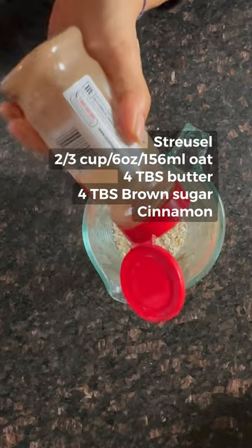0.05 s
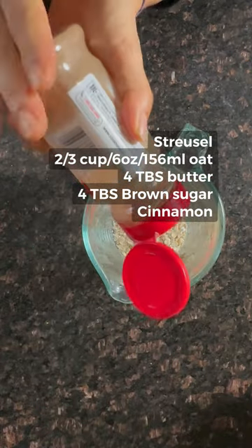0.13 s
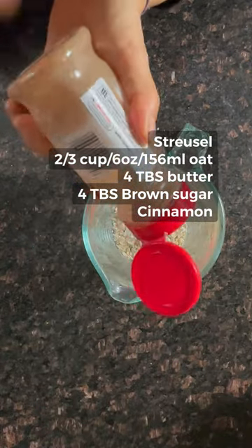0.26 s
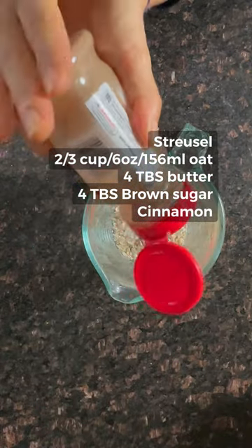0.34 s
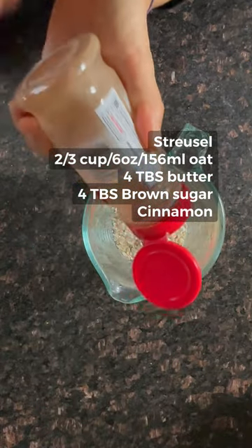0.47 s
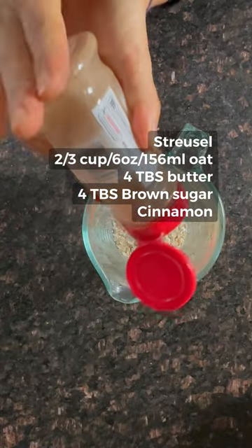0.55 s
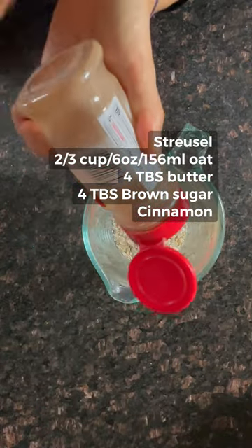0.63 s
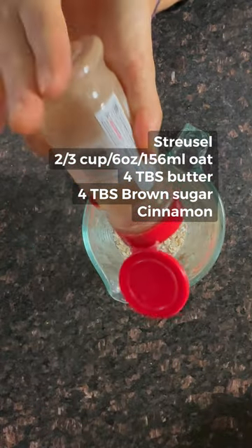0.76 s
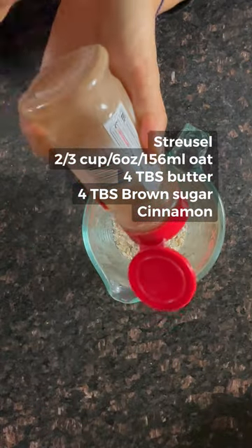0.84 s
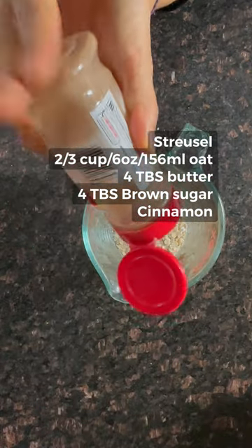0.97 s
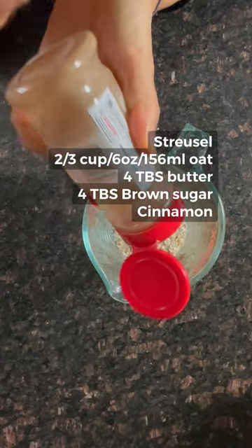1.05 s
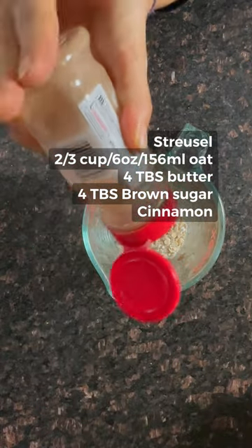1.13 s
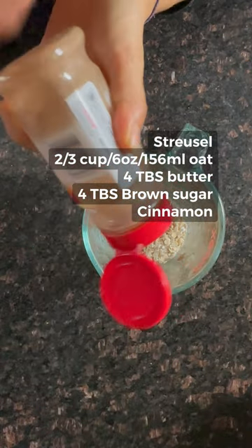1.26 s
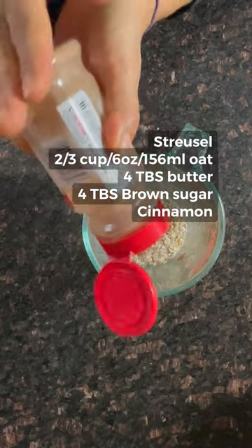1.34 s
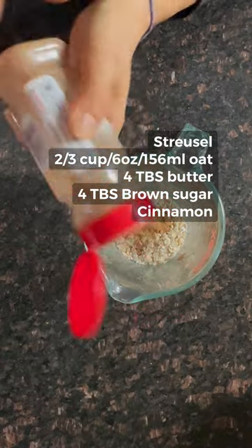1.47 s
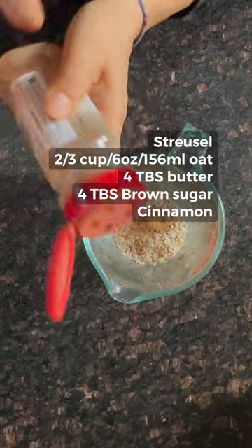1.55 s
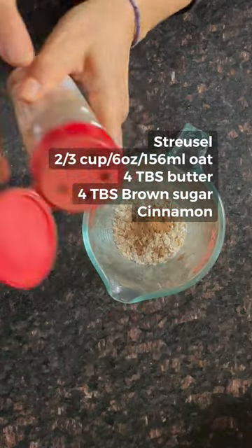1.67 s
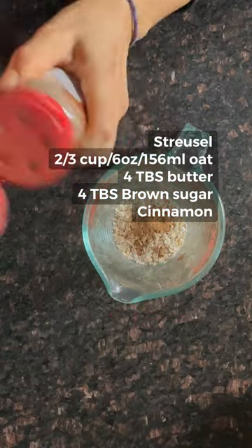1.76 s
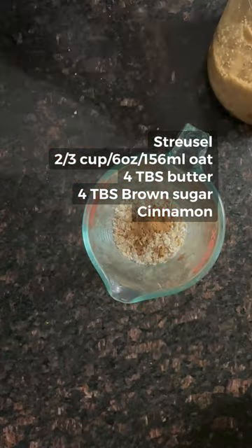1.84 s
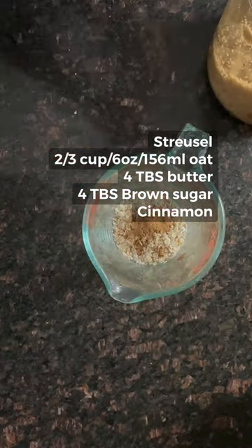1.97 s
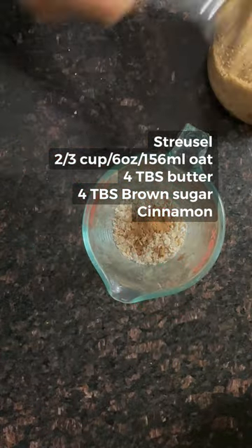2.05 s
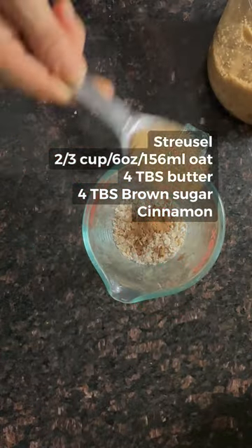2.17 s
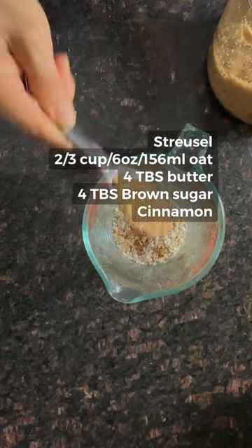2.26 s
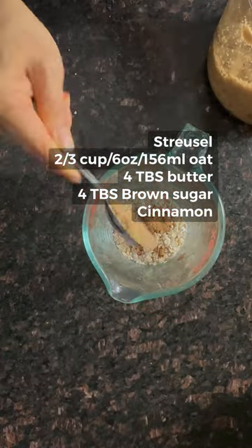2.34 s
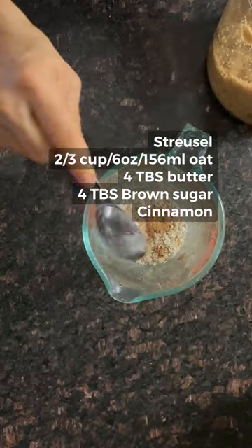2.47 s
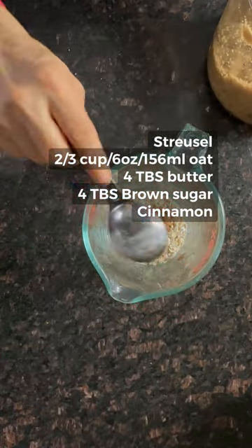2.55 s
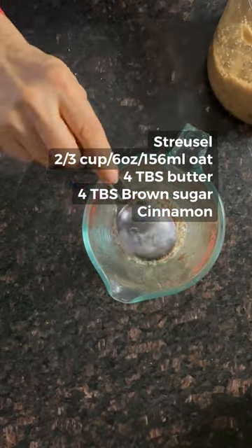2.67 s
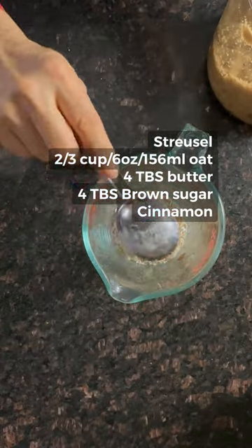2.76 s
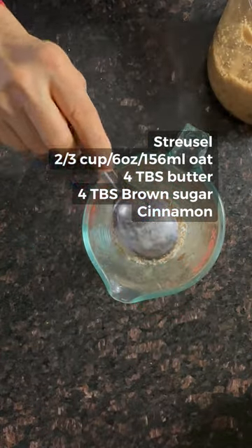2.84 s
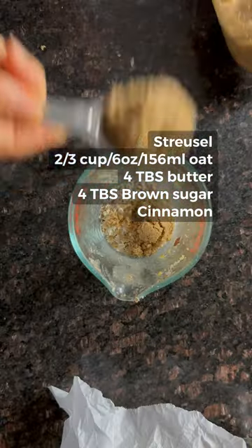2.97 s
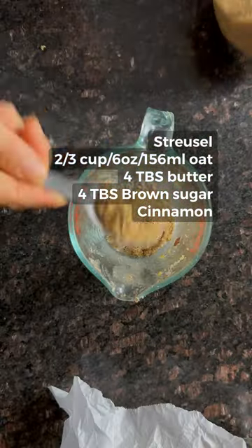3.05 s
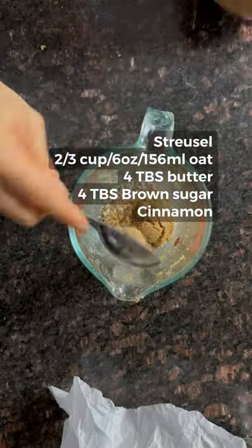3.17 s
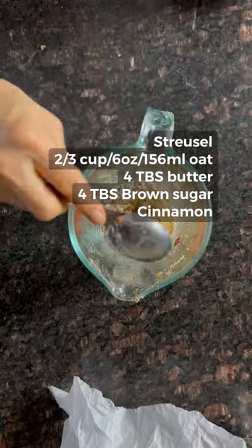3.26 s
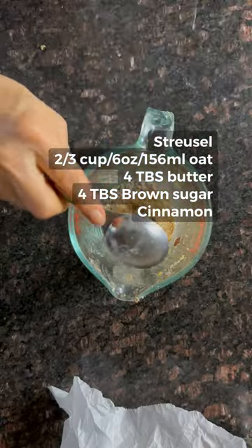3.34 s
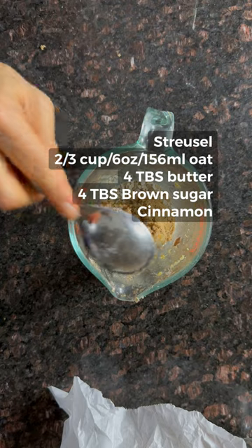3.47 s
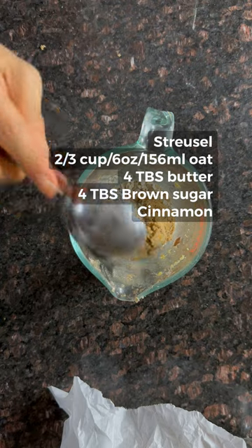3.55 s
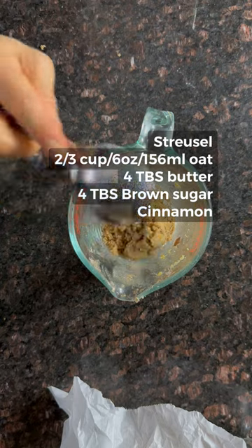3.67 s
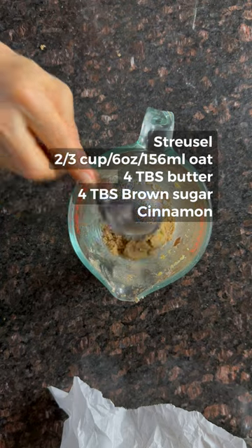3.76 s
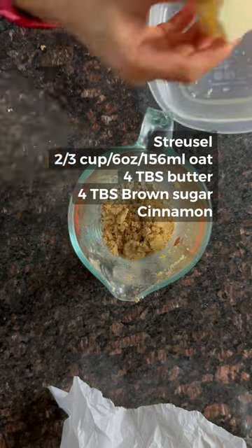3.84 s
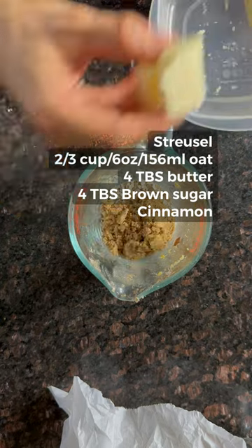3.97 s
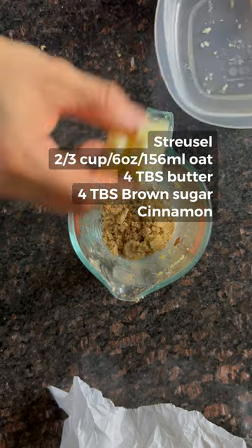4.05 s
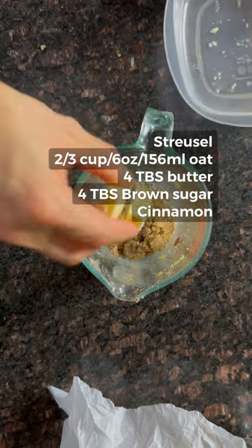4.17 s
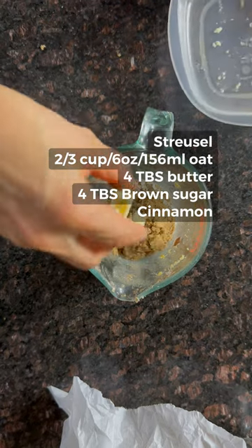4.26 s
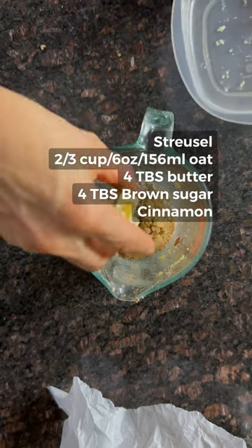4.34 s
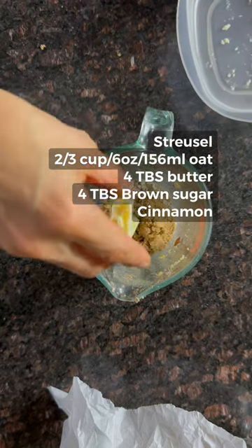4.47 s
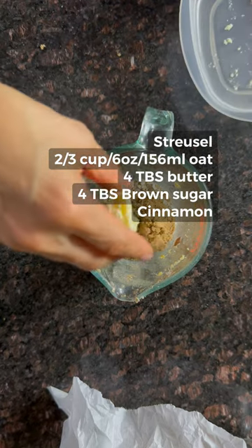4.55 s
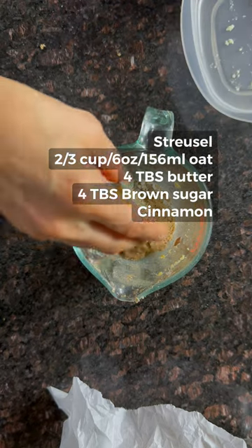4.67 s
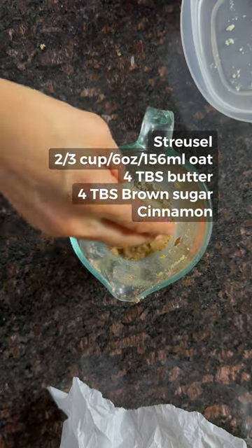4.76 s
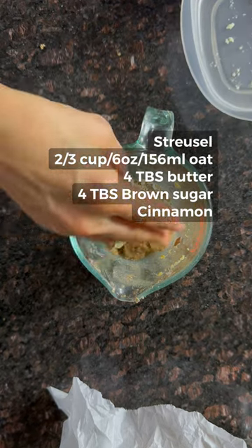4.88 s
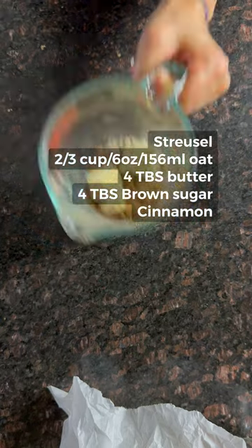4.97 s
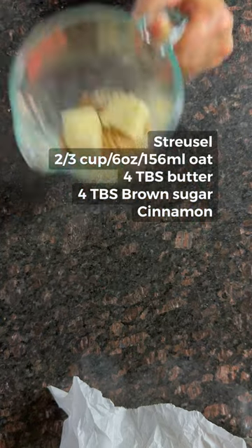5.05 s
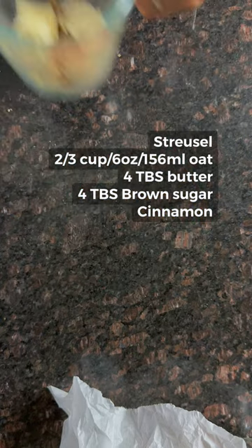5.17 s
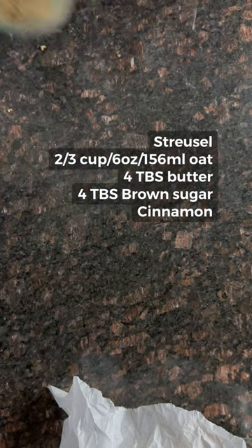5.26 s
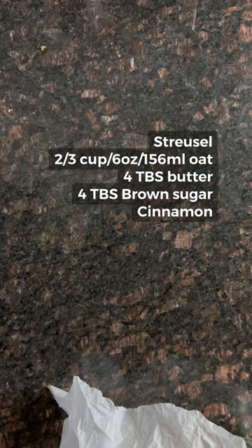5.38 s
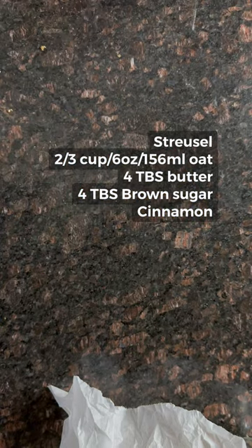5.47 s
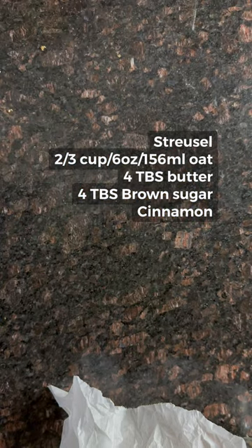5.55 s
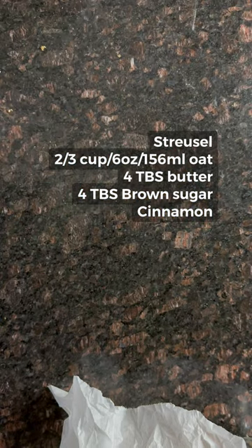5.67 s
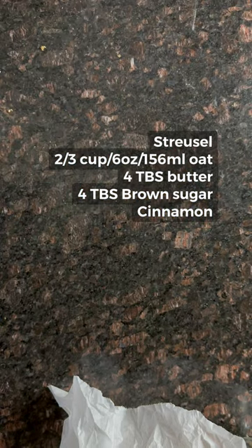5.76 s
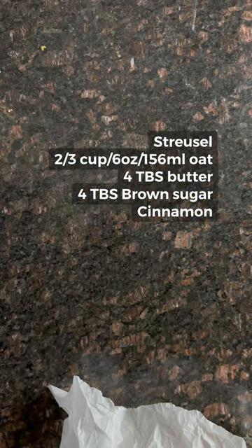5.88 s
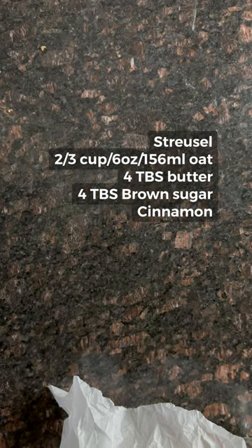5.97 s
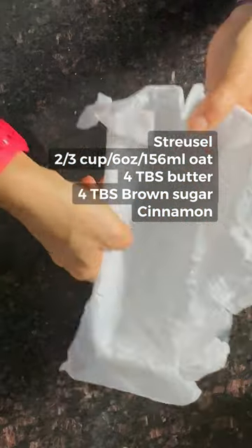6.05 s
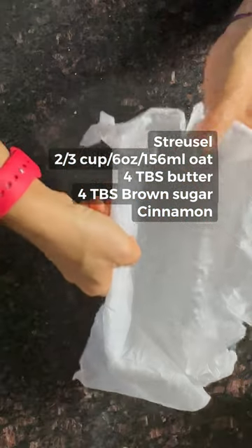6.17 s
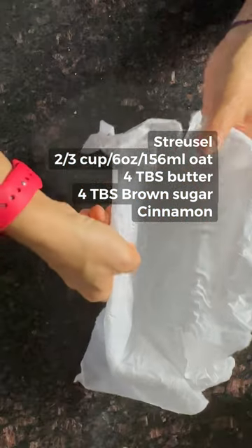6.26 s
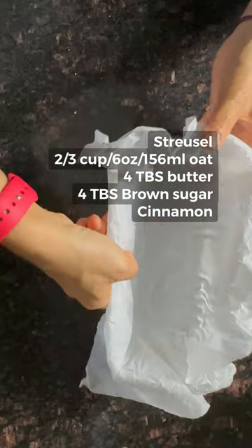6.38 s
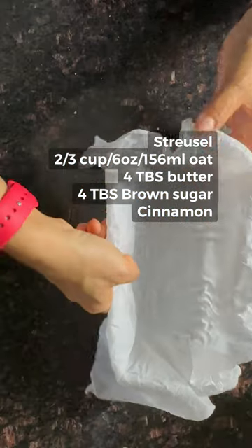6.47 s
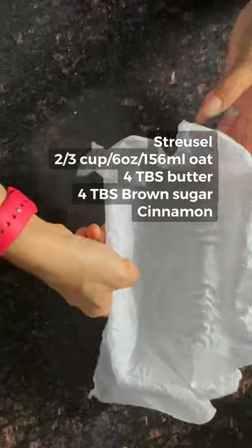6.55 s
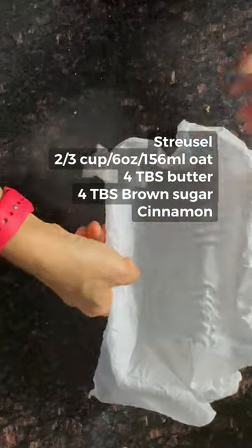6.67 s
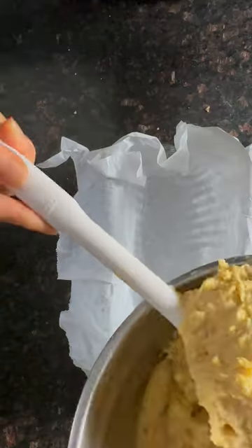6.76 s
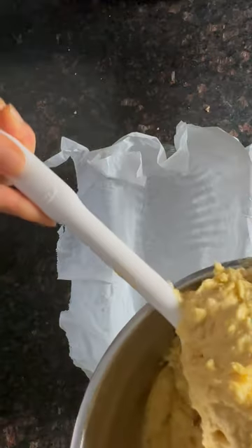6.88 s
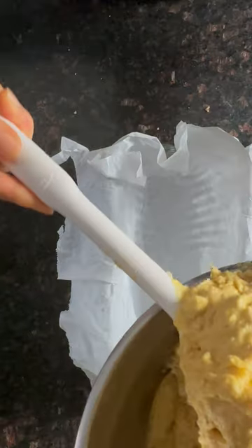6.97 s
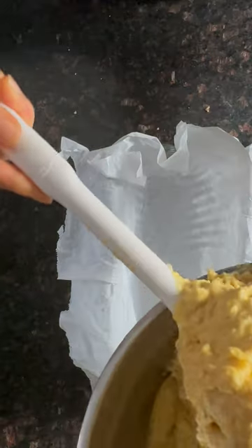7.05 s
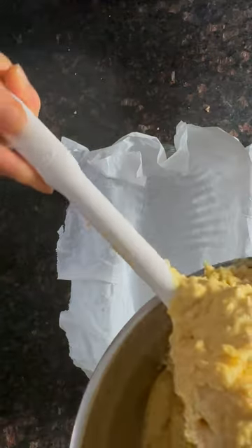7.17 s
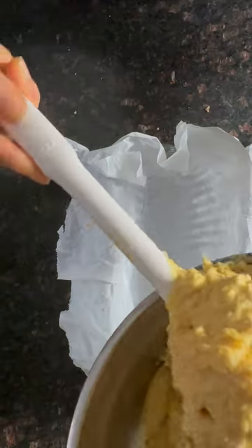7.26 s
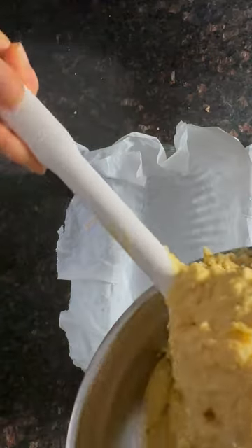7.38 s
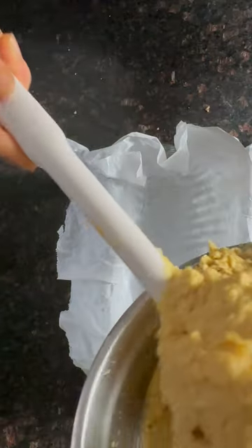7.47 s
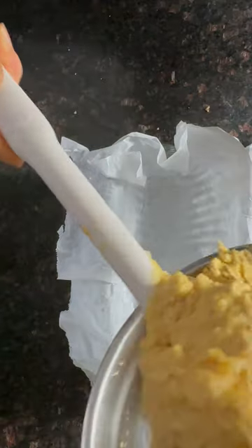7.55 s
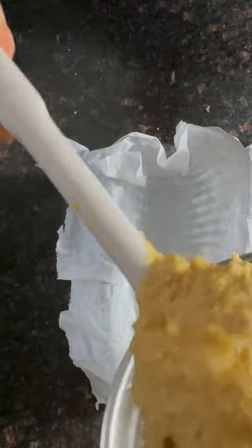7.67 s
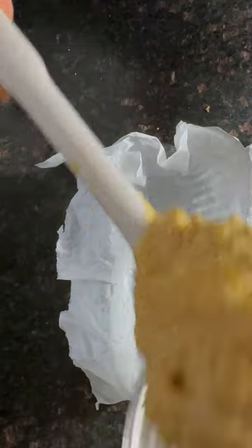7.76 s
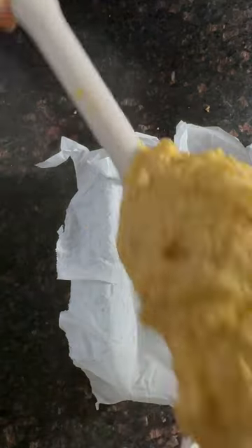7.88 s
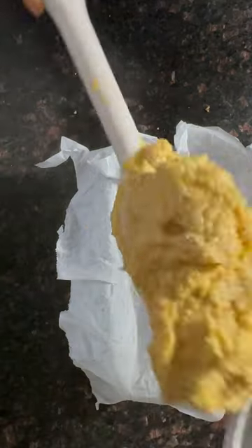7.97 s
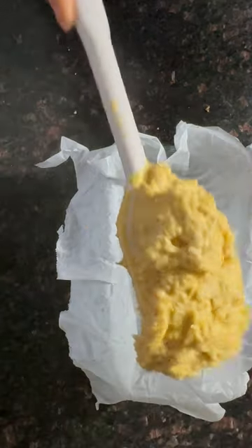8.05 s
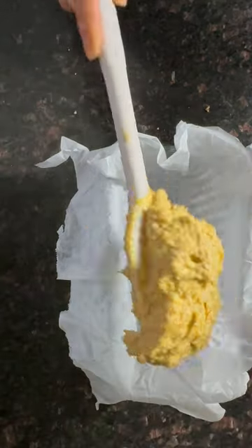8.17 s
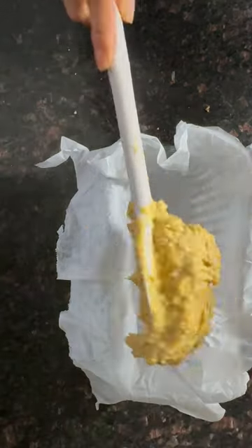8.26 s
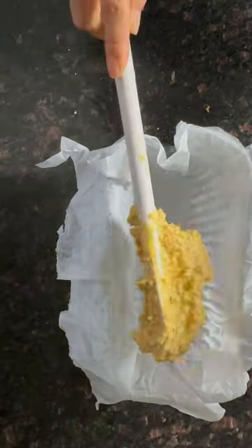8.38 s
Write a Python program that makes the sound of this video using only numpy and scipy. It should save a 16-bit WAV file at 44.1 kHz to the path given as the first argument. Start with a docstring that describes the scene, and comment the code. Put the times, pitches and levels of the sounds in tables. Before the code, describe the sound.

A low, steady refrigerator hum with soft moving air lasts throughout, in a kitchen with a short echo, heard closely in stereo. From 0.1 to 1.3 s a palm pats a hollow plastic jar every 0.2 s: dull, low-mid thumps with a quick rebound and tiny powder ticks, strongest from 0.3 to 0.9. Faint rubs follow. At 3.14 a lump of sugar drops with a brief grainy crunch; light street noise sits behind. At 3.76 a spoon knocks the glass cup in a rapid, damped clatter. From 3.8 to 4.98 a distant engine rises in pitch and swells with tyre noise, then cuts off with a small click. Faint crumbly ticks continue. At 6.03 come soft bumps and paper rustle, then a loud pan bang at 6.27, a brighter metallic contact around 6.46, and sharp paper snaps until 6.7. Afterwards, to 8.4, only very faint sticky crackles and scrapes over the hum.

```python
"""A refrigerator hum comes first and stays: a mains tone over shaped noise. In this kitchen, in short shots cut together,
a palm pats a plastic jar of cinnamon (damped modes, powder ticks), a spoon knocks sugar into a glass cup (grains,
clatter, ringing modes), a metal loaf pan lined with baking paper is put down (sheet noise, modes, snaps), and batter
is scraped from a bowl (crackling grains). For a moment a far vehicle gathers speed outside (rising engine orders
and tyre noise). Two microphones hear it all, most nearby sounds with a kitchen echo."""
import sys
import numpy as np
from scipy import signal
from scipy.fft import rfft, irfft, next_fast_len
from scipy.io import wavfile
from scipy.ndimage import uniform_filter1d, map_coordinates

SR = 44100
rng = np.random.default_rng(int(sys.argv[2]) if len(sys.argv) > 2 else 0)


def pcm_store(signal):
    """Save signal as 16-bit PCM."""
    levels = np.round(np.clip(np.atleast_2d(signal), -1, 1) * 32767)
    wavfile.write(sys.argv[1], SR, levels.astype(np.int16).T)


N = 371322


def amp(db):
    """Decibels to gain."""
    return 10 ** (np.asarray(db) / 20)


def unit(x):
    """Scale to rms 1."""
    return x / np.sqrt(np.mean(x ** 2) + 1e-20)


def crest(x):
    """Scale so that the loudest millisecond has rms 1."""
    power = uniform_filter1d(x ** 2, SR // 1000)
    return x / np.sqrt(power.max())


def along(points, hz):
    """Interpolate (frequency [Hz], value) points on a log frequency axis."""
    f, v = np.transpose(points)
    return np.interp(np.log(hz + 1), np.log(f), v)


def clock():
    """Time of every sample in seconds."""
    return np.arange(N) / SR


def during(start, end):
    """One between two times, silent outside."""
    return (clock() >= start) & (clock() < end)


def wobble(rate):
    """A smooth random curve, rate knots a second."""
    knots = rng.standard_normal(int(N * rate / SR) + 4)
    return map_coordinates(knots, [clock() * rate], order=2)


def filtered(x, response):
    """x times a complex response of frequency."""
    n = x.shape[-1]
    m = next_fast_len(n + 8192)
    hz = np.fft.rfftfreq(m, 1 / SR)
    return irfft(rfft(x, m) * response(hz), m)[..., :n]


def coloured(x, spectrum):
    """Causal minimum-phase filter with the given (frequency [Hz], level [dB]) spectrum."""
    size = 4096
    gain = amp(along(spectrum, np.fft.rfftfreq(size, 1 / SR)))
    cepstrum = irfft(np.log(gain))
    # folding the cepstrum forward in time makes the filter causal
    cepstrum[1:size // 2] *= 2
    cepstrum[size // 2 + 1:] = 0
    impulse = irfft(np.exp(rfft(cepstrum)))
    return signal.fftconvolve(x, impulse)[:len(x)]


def fade(t60):
    """Half a second of exponential decay, 60 dB in t60 seconds."""
    return amp(-60 * np.arange(SR // 2) / SR / t60)


def burst(t60):
    """Noise that dies away."""
    return rng.standard_normal(SR // 2) * fade(t60)


def tone(hz, t60):
    """One damped mode."""
    return np.sin(2 * np.pi * hz * np.arange(SR // 2) / SR) * fade(t60)


def ring(modes, longest):
    """Modes struck at new strengths and signs, none decaying slower than the longest t60."""
    total = 0
    for hz, db, t60 in modes:
        strength = rng.choice([-1, 1]) * amp(db + rng.normal(0, 5.3))
        total = total + strength * tone(hz, min(t60, longest))
    return crest(total)


def add(track, s, sound):
    """Mix a sound in at time s."""
    part = track[round(s * SR):][:len(sound)]
    part += sound[:len(part)]


def crackle(spectrum, rate, clump_db):
    """Tiny fractures, rate a second, of clipped log-normal size, whose level swells in clumps."""
    sizes = amp(5 * np.clip(rng.standard_normal(N), -2, 2))
    struck = rng.random(N) < rate / SR
    grains = struck * rng.choice([-1, 1], N) * sizes
    return unit(coloured(grains * amp(clump_db * wobble(60)), spectrum))


def strokes(rows, attack_s, t60):
    """Gain of (start, length, dB) gestures: each swells, holds and dies away."""
    t = clock()
    gain = 0
    for s, length, db in rows:
        swell = np.clip((t - s) / attack_s, 0, 1)
        decay_db = -60 * np.clip((t - s - length) / t60, 0, 2)
        gain = gain + swell * amp(db + decay_db)
    return gain


# how alike the left and right microphones hear diffuse sound: (frequency [Hz], correlation [0-1])
LIKENESS = [(100, 1), (300, 0.98), (700, 0.36), (1500, 0.47), (3500, 0.056), (6000, 0.9), (9000, 0.38),
            (12000, 0.99)]


def diffuse(size):
    """Stereo noise from all around, whose left-right likeness depends on frequency."""
    def turn(hz):
        return np.arccos(np.clip(along(LIKENESS, hz), -1, 1)) / 2

    noise = rng.standard_normal((2, size))
    mid, side = filtered(noise, lambda hz: np.array([np.cos(turn(hz)), np.sin(turn(hz))]))
    return np.array([mid + side, mid - side])


def rush(spectrum):
    """Steady diffuse noise of rms 1 with the given spectrum."""
    return unit(filtered(diffuse(N), lambda hz: amp(along(spectrum, hz))))


# reverberation of the kitchen: (frequency [Hz], t60 [s])
KITCHEN_T60 = [(150, 0.15), (800, 0.32), (4000, 0.33), (9000, 0.25), (15000, 0.067)]


def echo():
    """A fresh stereo tail of decaying noise for the kitchen, with energy 1 on the left."""
    hz, t, z = signal.stft(diffuse(SR // 2), SR, nperseg=256)
    decay = amp(-60 * t / along(KITCHEN_T60, hz)[:, None])
    tail = signal.istft(z * decay, SR, nperseg=256)[1]
    return tail / np.linalg.norm(tail[0])


# shot boundaries, where one shot ends and the next begins: (time [s])
SHOT_EDGES = [0, 3.0, 3.826, 4.985, 6.03, 6.72, 8.43]


def placed(x, pan_db, wet_db):
    """A source at two microphones (positive pan is left), with kitchen echo that ends at each cut."""
    out = amp(pan_db * np.array([[.5], [-.5]])) * x
    for start, end in zip(SHOT_EDGES, SHOT_EDGES[1:]):
        shot = slice(round(start * SR), round(end * SR))
        dry_shot = x[shot]
        wet = signal.fftconvolve(dry_shot[None], echo(), axes=1)
        out[:, shot] += amp(wet_db) * wet[:, :len(dry_shot)]
    return out


# shape of the low drone of the refrigerator: (frequency [Hz], relative level [dB])
FRIDGE_DRONE = [(20, -40), (38, -12.5), (51, 7.5), (62, -2), (90, -1.5), (150, -2), (185, -14), (215, -5),
                (270, -21), (400, -56.5)]
# shape of its moving air: (frequency [Hz], relative level [dB])
FRIDGE_AIR = [(150, -10.5), (300, 2.5), (480, 1), (650, -2.5), (850, -2), (1300, -8.5), (2000, -13.5),
              (3200, -17), (4200, -24), (6500, -36.5), (10500, -35.5), (12000, -35), (16000, -29.5)]


def fridge():
    """The compressor hums at twice the mains frequency over a low drone and moving air."""
    hum = np.sqrt(2) * np.sin(2 * np.pi * 119.8 * clock())
    hum_gain = amp(-40 + 1.5 * wobble(2.1))
    return hum_gain * hum + amp(-45.5) * rush(FRIDGE_DRONE) + amp(-61.5) * rush(FRIDGE_AIR)


# soft bumps on the counter: (time [s], relative level [dB], pitch [Hz], t60 [s])
COUNTER_BUMPS = [(0.089, -32.5, 433, 0.034), (3.763, -30, 148, 0.063), (3.833, -27.5, 84, .09),
                 (6.03, -30.5, 135, 0.074), (6.147, -25, 155, 0.081)]


def bumps():
    """Dull knocks through the counter: damped tones with a rounded onset."""
    out = np.zeros(N)
    for s, db, hz, t60 in COUNTER_BUMPS:
        add(out, s, amp(db + 7.0) * tone(hz, t60) * (1 - fade(t60 / 2)))
    return out


# resonances of the hollow jar: (nominal frequency [Hz], bandwidth [Hz], mean level [dB])
JAR_MODES = [(233, 55, -5), (468, 250, 10), (718, 200, 21.5), (882, 79, 11), (990, 220, -18)]


def thump():
    """One push on the hollow jar; the grip shifts its resonances a little every time."""
    body = 0
    for hz, width, db in JAR_MODES:
        gain = amp(db + rng.normal(0, 3.3))
        shifted_hz = hz * (1 + rng.normal(0, 0.028))
        t60 = np.log(1000) / np.pi / width  # a wider resonance dies sooner
        body = body + gain * tone(shifted_hz, t60)
    band = signal.butter(4, [220, 1080], "bandpass", fs=SR, output="sos")
    return crest(signal.sosfilt(band, body))


# palm pats on the jar: (time [s], relative thump level [dB], powder tick relative to the thump [dB])
JAR_PATS = [(0.091, -40.5, -6), (0.293, -15, -22.5), (0.502, -10.5, -20.5), (0.698, -10.5, -20),
            (0.896, -12, -22), (1.088, -26, -10.5), (1.28, -37, -9.5)]
# colour of powder against the wall: (frequency [Hz], relative level [dB])
POWDER_COLOUR = [(900, 0), (1700, -6.5), (2300, -1.5), (2900, -7), (3400, 1), (3900, -6), (5600, -6),
                 (6400, -7.5), (8000, -6.5), (9200, -9.5), (12000, -10), (15500, -10.5)]
# faint ring of the jar rim: (frequency [Hz], mean level [dB], t60 [s])
RIM_MODES = [(3330, -1, .08), (3530, 1, .14), (3620, 0, .1)]


def jar(rebound_s=0.004654, rebound_db=-3, delay_s=0.0026, wet_db=-13):
    """Each pat ticks the powder against the wall, then the hollow jar thumps and rebounds."""
    direct, tails = np.zeros(N), np.zeros((2, N))
    for s, db, tick_db in JAR_PATS:
        body = amp(db) * thump()
        grains = crest(coloured(burst(0.034), POWDER_COLOUR))
        tick = amp(db + tick_db + 2.5) * (grains + amp(-25) * ring(RIM_MODES, longest=.25))
        thump_s = s + delay_s
        add(direct, s, tick)
        add(direct, thump_s, amp(-2.5) * body)
        jitter_s = rng.uniform(-0.00048, 0.00039)
        add(direct, thump_s + rebound_s + jitter_s, amp(db + rebound_db) * thump())
        for side, tail in zip(tails, echo()):  # the jar moves, so each pat has its own echo
            add(side, thump_s, amp(wet_db) * signal.fftconvolve(body + amp(3) * tick, tail))
    return amp([[-.8], [.8]]) * direct + tails


# fingers and utensils rub on sugar and sticky batter: (start [s], length [s], relative level [dB])
HAND_RUBS = [(1.47, .14, -71), (1.645, .04, -53), (1.7, 0.04, -65), (2.04, 0.024, -63), (2.54, .06, -67),
             (2.595, 0.013, -53), (3.92, 0.14, -77), (4.97, 0.038, -58), (5.05, 0.14, -67),
             (5.24, .12, -70.5), (5.445, .07, -70.5), (5.6, 0.049, -65), (5.72, .11, -67),
             (5.835, .085, -66), (6.84, 0.16, -71.5), (7.1, .09, -62.5), (7.22, .2, -69.5),
             (7.43, 0.18, -70.5), (7.77, .07, -75.5), (7.9, 0.057, -64.5), (8.04, 0.053, -71),
             (8.34, .08, -69)]
# a utensil or the jar scrapes on a hard surface: (start [s], length [s], level [dB])
UTENSIL_SCRAPES = [(1.645, 0.049, -63), (2.595, 0.021, -63), (7.11, 0.083, -69.5), (7.525, .03, -67),
                   (7.585, 0.028, -63), (8.03, .09, -70.5)]
# small ticks of sugar, fingers and sticky batter, and at 4.9757 s a click at the cut between shots:
# (time [s], relative level [dB])
SMALL_TICKS = [(1.8143, -54), (2.148, -53.5), (4.2671, -49.5), (4.8933, -50), (4.9757, -46), (5.118, -48.5),
               (5.3033, -49), (5.3491, -50.5), (6.8947, -45), (6.9461, -51.5), (7.2984, -54), (7.3118, -46),
               (7.4034, -51.5)]
# colour of the rubs, ticks and click: (frequency [Hz], relative level [dB])
CRUMB_COLOUR = [(700, -9), (1700, 0.5), (3000, -2.5), (4500, -5.5), (7000, 0.5), (10000, -2.5), (15500, -5)]
# colour of the scrapes: (frequency [Hz], relative level [dB])
BOWL_COLOUR = [(500, -12.5), (1300, -2.5), (2600, 1), (3600, 0.5), (5000, -5.5), (8000, -12),
               (15000, -18.5)]


def handling():
    """Sugar and sticky batter crackle faintly under the hand; utensils scrape; a click marks one cut."""
    rub_gain = amp(-3) * strokes(HAND_RUBS, attack_s=0.019, t60=0.2)
    scrape_gain = strokes(UTENSIL_SCRAPES, attack_s=.025, t60=0.22)
    out = rub_gain * crackle(CRUMB_COLOUR, rate=900, clump_db=2.5)
    out += scrape_gain * crackle(BOWL_COLOUR, rate=3500, clump_db=0.5)
    for s, db in SMALL_TICKS:
        add(out, s, amp(db - 8.0) * crest(coloured(burst(0.05), CRUMB_COLOUR)))
    return placed(out, 0, wet_db=-6)


PASS_S, PASS_HZ, PASS_DB = 4.85, 185, -42.5  # engine at its nearest: time, pitch, level before order gains
REV_OCTAVES_PER_S, APPROACH_DB_PER_S = 0.83, 20
TYRE_DB, TYRE_DB_PER_S = -55, 26.5  # tyre noise at the nearest point, and its growth on the way
# steady street noise in the second and third shots: (level [dB])
STREET_LEVELS = (-58.5, -66)
# harmonics of the far engine: (engine order, mean level [dB])
ENGINE_ORDERS = [(1, 1.5), (2, -19.5), (3, -18.5), (5, -23)]
# colour of tyre and street noise: (frequency [Hz], relative level [dB])
TYRE_COLOUR = [(200, 3.5), (480, 4), (950, -4), (1300, -4.5), (1850, -7), (3000, -19), (4500, -33),
               (8000, -40)]


def vehicle():
    """Over the street noise a far engine climbs steadily in pitch and grows louder as it nears."""
    t = clock() - PASS_S
    to_go = np.maximum(-t, 0)
    hz = PASS_HZ * 2 ** (REV_OCTAVES_PER_S * t) * (1 + 0.004 * wobble(7.0))
    phase = 2 * np.pi * np.cumsum(hz) / SR
    note = sum(amp(db + 2.4 * wobble(9)) * np.sin(round(order) * phase) for order, db in ENGINE_ORDERS)
    engine = amp(PASS_DB - APPROACH_DB_PER_S * to_go) * note
    tyres = amp(TYRE_DB - TYRE_DB_PER_S * to_go) * rush(TYRE_COLOUR)
    street_shots = zip(STREET_LEVELS, SHOT_EDGES[1:], SHOT_EDGES[2:])
    street_gain = sum(amp(db) * during(start, end) for db, start, end in street_shots)
    audible = during(SHOT_EDGES[2], SHOT_EDGES[3])  # the vehicle is heard in the third shot only
    return audible * (engine + tyres) + street_gain * rush(TYRE_COLOUR)


# sugar slides off the spoon: (start [s], length [s], level [dB])
SUGAR_POURS = [(3.12, .02, -60), (3.138, 0.021, -33), (3.285, .025, -61)]
# colour of the falling sugar: (frequency [Hz], relative level [dB])
SUGAR_COLOUR = [(150, -9.5), (260, -0.5), (450, 2), (1000, -6), (1250, -12), (2200, -14.5), (3600, -20),
                (4900, -23.5), (5650, -12), (6250, -27), (7000, -16), (8000, -27), (10400, -21.5),
                (15000, -43.5)]
# ring of the spoon: (frequency [Hz], mean level [dB], t60 [s])
SPOON_MODES = [(3520, 2, 0.25), (6640, -6, 0.35), (7600, -11, 0.45), (9900, 2, 0.2)]


def sugar():
    """A heap of sugar drops into the cup as crackling grains and leaves the spoon ringing faintly."""
    pour_gain = strokes(SUGAR_POURS, attack_s=.004, t60=0.039)
    out = pour_gain * crackle(SUGAR_COLOUR, rate=3200, clump_db=1.0)
    add(out, 3.143, amp(-59.0) * ring(SPOON_MODES, longest=.7))
    return placed(out, 0.5, wet_db=-6.5)


# spoon knocks on the cup: (time [s], clatter level [dB], clatter t60 [s], relative ring level [dB])
SPOON_KNOCKS = [(3.749, -42.5, 0.017, -7), (3.759, -21, .045, -11), (3.762, -20.5, 0.06, -3.5),
                (3.767, -28, 0.055, -4.5), (3.778, -26, .06, -5.5), (3.784, -28, 0.081, -4.5)]
# modes of the glass cup: (frequency [Hz], mean level [dB], t60 before sugar damping [s])
CUP_MODES = [(626.6, -4, 0.2), (752, 2.5, 0.13), (900, -3, 0.11), (1432, -1, 0.15), (1550, -9, 0.14),
             (2040, -6, .1), (3265, -13, 0.14), (5350, -13.5, 0.032), (6840, -21, 0.17), (6800, -14, 0.16),
             (7460, -6, 0.17), (10280, -11.5, 0.11)]
# colour of the clatter: (frequency [Hz], relative level [dB])
CLATTER_COLOUR = [(100, -7.5), (160, -3), (400, -17), (560, 1.5), (750, 3.5), (950, -4), (1200, -15),
                  (2000, -12), (2700, -22), (4500, -25), (7400, -18.5), (8500, -23), (16000, -18.5)]


def spoon():
    """The spoon clatters on the cup, whose ring is damped by sugar."""
    out = np.zeros(N)
    for s, db, t60, ring_db in SPOON_KNOCKS:
        clatter = crest(coloured(burst(t60), CLATTER_COLOUR))
        cup = amp(ring_db - 1.5) * ring(CUP_MODES, longest=0.12)
        add(out, s, amp(db) * (clatter + cup))
    return placed(out * (clock() < SHOT_EDGES[2]), -1.9, wet_db=-11)


# the hands flex the baking paper: (start [s], length [s], level [dB])
PAPER_FLEXES = [(6.03, 0.023, -46), (6.066, 0.011, -50), (6.165, 0.056, -45), (6.24, 0.16, -41.5),
                (6.44, .15, -39.5), (6.64, 0.086, -44)]
# snaps of its creases: (time [s], level of the loudest millisecond [dB])
PAPER_SNAPS = [(6.0423, -50), (6.077, -45), (6.1674, -40), (6.2268, -37), (6.2897, -17.5), (6.4127, -21.5),
               (6.541, -28.5), (6.5534, -26.5), (6.5912, -26), (6.6346, -42), (6.6907, -27.5),
               (6.7065, -34.5)]
# colour of the paper: (frequency [Hz], relative level [dB])
PAPER_COLOUR = [(200, -14.5), (400, -7.5), (750, 6.5), (1500, -2), (2800, 0.5), (4700, -8), (6000, -5.5),
                (7500, -9), (9200, -9), (12000, -16), (15500, -11.5)]


def paper():
    """Baking paper rustles as it is flexed, and its creases snap."""
    flex_gain = strokes(PAPER_FLEXES, attack_s=0.017, t60=.17)
    out = flex_gain * crackle(PAPER_COLOUR, rate=2300, clump_db=4.0)
    for s, db in PAPER_SNAPS:
        snap = coloured(burst(0.019) * (1 - fade(0.0049)), PAPER_COLOUR)
        add(out, s, amp(db) * crest(np.diff(snap, prepend=0)))  # snaps are brighter than the rustle
    return placed(out * (clock() < SHOT_EDGES[5]), 0, wet_db=-6.5)


# pan contacts on the counter: (time [s], level before softening [dB], nominal brightness [Hz],
# relative thud level [dB], relative ring level [dB])
PAN_CONTACTS = [(6.046, -38, 1300, -11.5, -3.5), (6.076, -40, 1300, -17.5, -4.5),
                (6.262, -24.5, 1496, -3.5, -6.5), (6.271, -1, 1572, -3, -13.5),
                (6.28, -8.5, 1099, -2.5, -14), (6.412, -22, 5000, -33, -21.5),
                (6.448, -22.5, 3520, -24.5, 5.5), (6.457, -6, 4796, -23.5, -1),
                (6.473, -10, 2893, -1, -8.5), (6.497, -15, 2545, -19, -5.5), (6.635, -32, 1513, -20, 2.5)]
# modes of the metal pan: (frequency [Hz], mean level [dB], t60 before the cap [s])
PAN_MODES = [(469.3, -8.5, 0.52), (617.7, -5, 0.27), (713, -1, .2), (795, -6, 0.2), (1077, -7.5, 0.34),
             (1296, -10.5, 0.49), (1456, -9.5, .22), (1756, -8, 0.25), (2024, -13, 0.28), (2470, -17, 0.11),
             (2860, -5, 0.27), (3619, -2, 0.14), (4136, -13.5, .3), (4366, -5.5, .15), (6411, -2, 0.22)]
# colour of the struck sheet: (frequency [Hz], relative level [dB])
SHEET_COLOUR = [(100, -18.5), (210, -7.5), (320, -3), (480, 0), (750, 3.5), (1150, -4.5), (1500, -3.5),
                (2000, 3), (3000, -6.5), (3800, -1.5), (5000, -14), (8000, -6), (14000, -37)]


def pan(width_db=-6, wide_hz=1100):
    """The pan lands on one edge, then the other; a lowpass dulls each contact, and its treble is wide."""
    out, side = np.zeros((2, N))
    for s, db, bright_hz, thud_db, ring_db in PAN_CONTACTS:
        soft = signal.butter(3, min(0.94 * bright_hz, SR / 3), fs=SR, output="sos")
        for track, wall_db in ((out, 0), (side, width_db)):
            sheet = crest(coloured(burst(0.0092) + amp(-5.0) * burst(0.057), SHEET_COLOUR))
            blow = sheet + amp(ring_db - 12.0) * ring(PAN_MODES, longest=.28)
            add(track, s, amp(db + wall_db) * signal.sosfilt(soft, blow))
        thud = (tone(95, .08) - tone(205, 0.069)) * (1 - fade(0.014))
        add(out, s, amp(db + thud_db - 12.5) * thud)
    # the side signal has opposite signs at the two microphones
    treble = signal.butter(1, wide_hz, "highpass", fs=SR, output="sos")
    side = signal.sosfilt(treble, side)
    stereo = placed(out, -1.5, wet_db=-10.0) + np.array([side, -side])
    return stereo * during(SHOT_EDGES[4], SHOT_EDGES[5])


def scene():
    """All sources together, in order of first appearance."""
    start = fridge() + bumps() + jar() + handling()
    return start + vehicle() + sugar() + spoon() + paper() + pan()


TOP_HZ = 15900  # band limit of the microphones' signal
# phase between the microphones: (frequency [Hz], lead of the right one [rad])
MIC_PHASE = [(2500, 0), (3600, .4), (4300, .5), (4900, 1.6), (5600, .2), (7500, .3), (9300, 1.4),
             (10700, 2.2), (11800, 3.14), (14000, 3.14), (15000, 2.6)]


def record(dry):
    """The microphones differ in treble phase, the loudest peaks are rounded, and the band limit cuts the top."""
    sides = np.array([[-.5], [.5]])
    ports = filtered(dry, lambda hz: np.exp(1j * sides * along(MIC_PHASE, hz)))
    rounded = ports / (1 + (ports / .92) ** 6) ** (1 / 6)
    return filtered(rounded, lambda hz: hz < TOP_HZ)


dry = scene()
out = record(dry)
pcm_store(out)
```